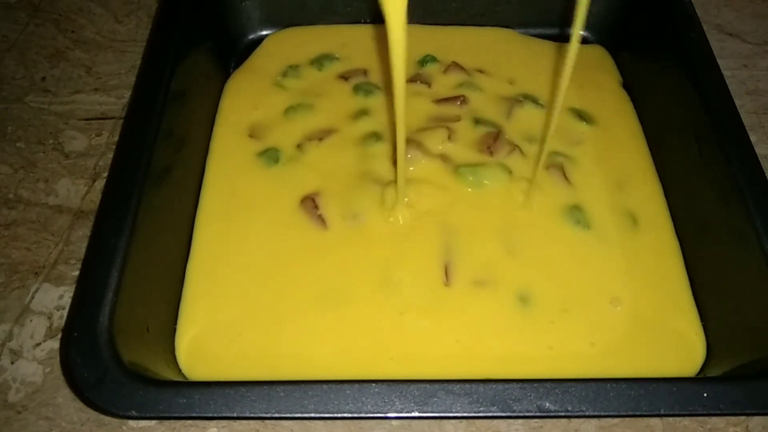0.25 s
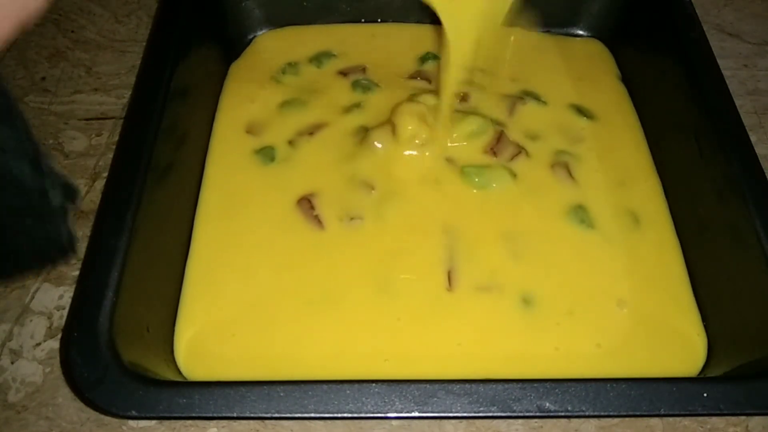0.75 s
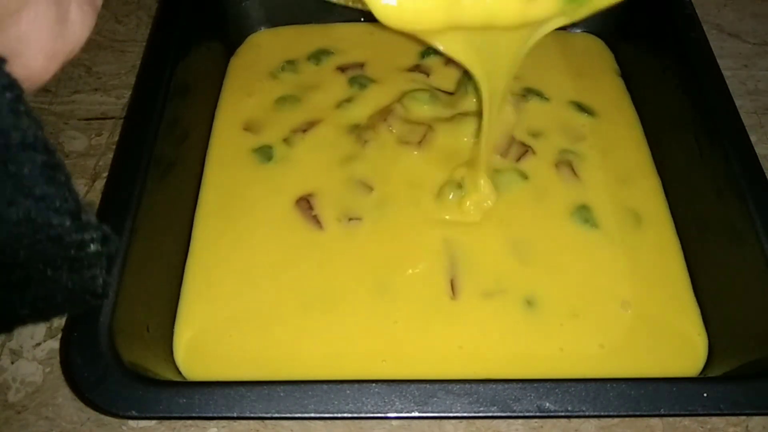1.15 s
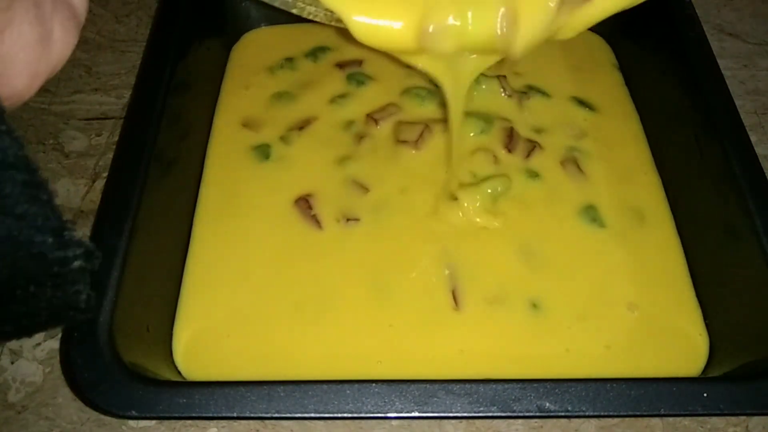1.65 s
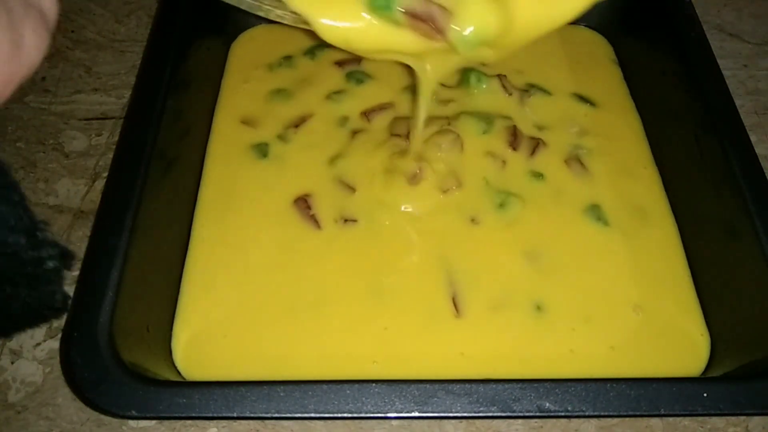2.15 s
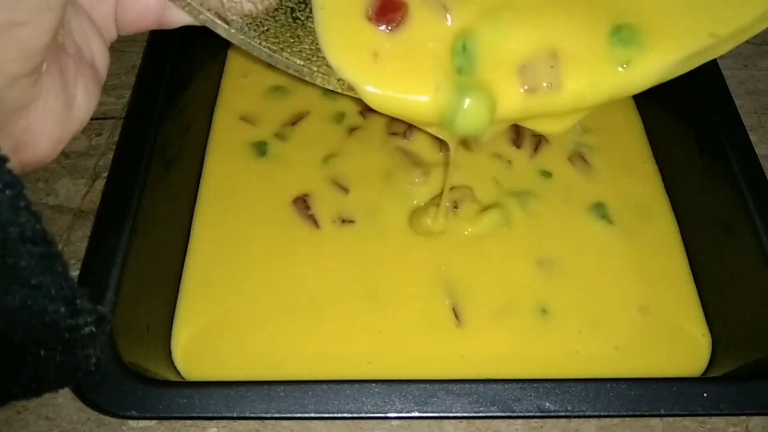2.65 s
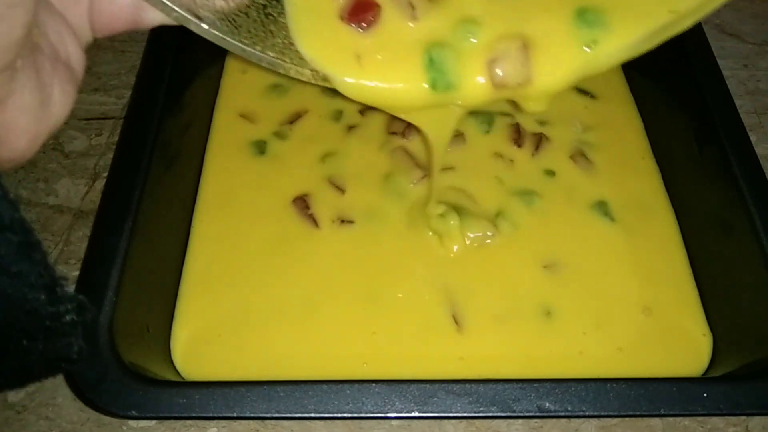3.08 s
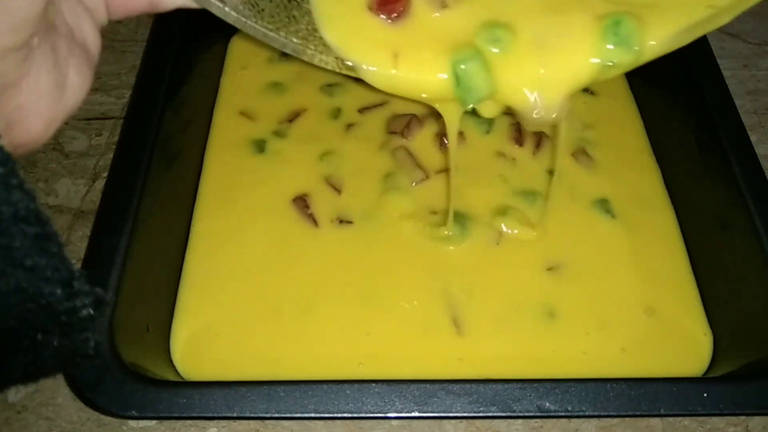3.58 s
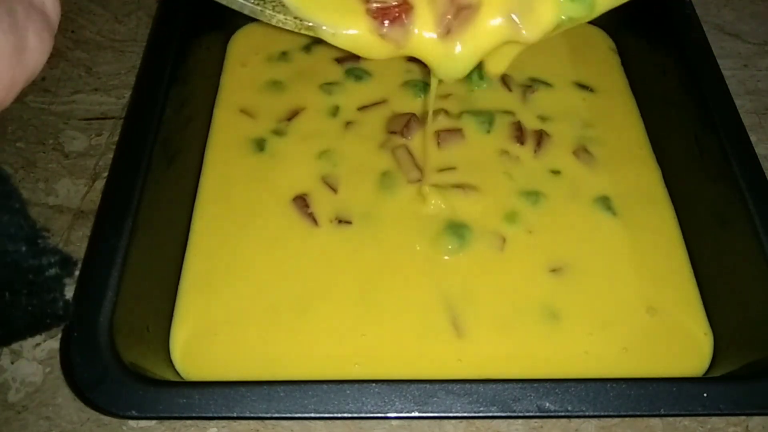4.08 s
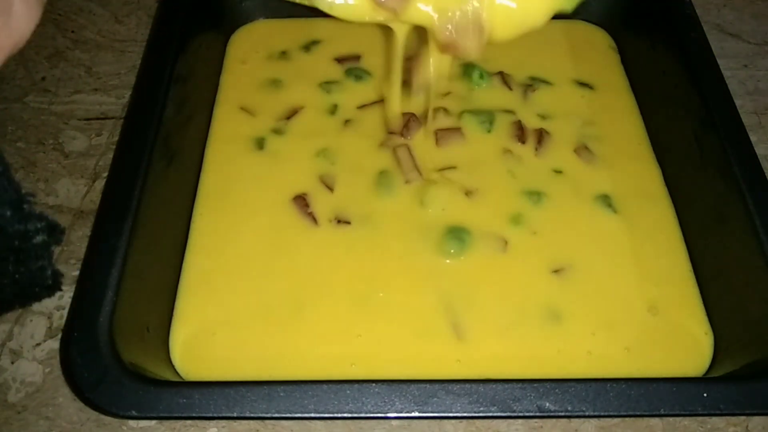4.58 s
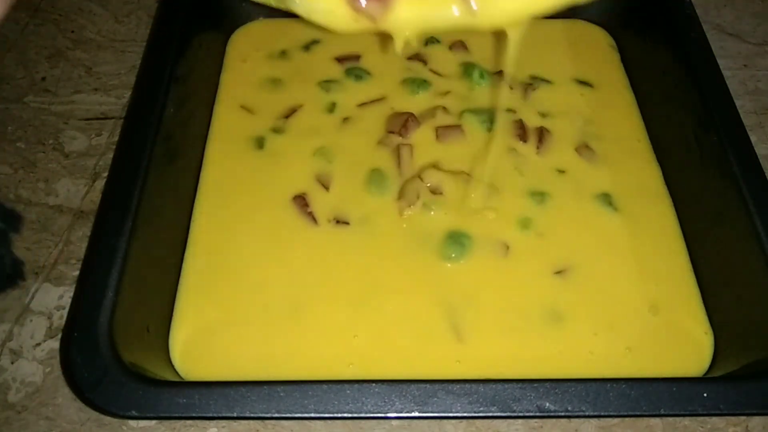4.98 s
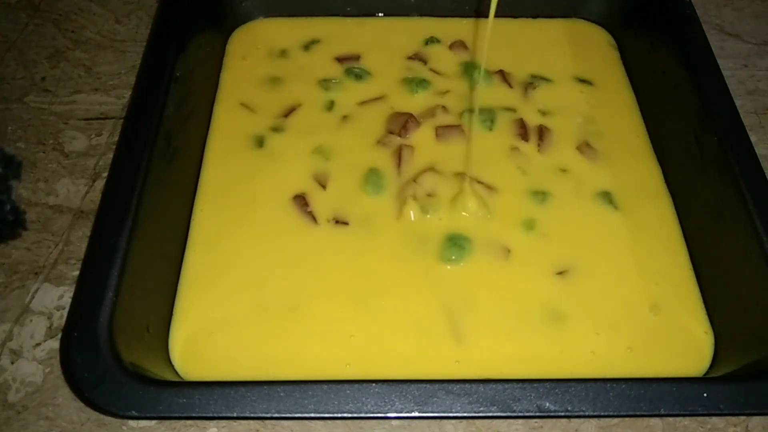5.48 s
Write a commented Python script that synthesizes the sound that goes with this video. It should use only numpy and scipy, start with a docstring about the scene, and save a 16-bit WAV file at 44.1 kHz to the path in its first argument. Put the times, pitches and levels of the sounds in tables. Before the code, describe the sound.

A wire whisk scrapes batter from a glass bowl, with irregular light clinks and one sharp, louder clink near the end.

```python
"""A wire whisk scrapes batter out of a glass bowl in a small hard kitchen.
Each touch is a short rattle of wires that rings the batter-damped glass; blows also thud and start
two longer rings. The wires drag through batter with a flickering hiss, and the bowl sings faintly
near 2.4 kHz under the early scraping. The walls return a dull tail over a low hum and hiss."""
import sys
import numpy as np
from scipy import signal
from scipy.fft import rfft, irfft, next_fast_len
from scipy.io import wavfile
from scipy.ndimage import uniform_filter1d

SR = 44100
rng = np.random.default_rng(int(sys.argv[2]) if len(sys.argv) > 2 else 0)


def int16_out(signal):
    """Quantize to a 16-bit WAV file."""
    q = np.round(np.clip(np.atleast_2d(signal).T, -1, 1) * 32767)
    wavfile.write(sys.argv[1], SR, q.astype(np.int16))


N = 252693
THUD, KNOCK, RIM_RING, CLANK, UPPER_RING, MAIN_RING, SCRATCH, WIRE_TICK = range(8)  # bowl parts

# Whisk blows; thud_db to upper_db are relative to level_db, the main ring's peak:
# start_s, level_db, thud_db, dull_db, bright_db, rim_db, upper_db, contact_ms, glass_db, knock_hz
BLOWS = [(0.06, -42.5, -12, -7, -5.0, -41.0, -42.0, 2, -15, 1000),
         (0.418, -50, -1.5, -2, -9, -10, -18.5, 1.3, 5, 1460),
         (0.478, -49.5, -5, 10, -1, -32, -39.0, 2.3, 2, 2340),
         (0.688, -62.5, 9, 18, -2.0, -41.5, -32.0, 4.7, 1, 3200),
         (0.696, -40.0, -38, -4.5, -1, -35, -30, 1.46, -13, 3540),
         (0.8616, -32.0, -16.0, -9, -5, -42, -29.0, 1.9, -11, 3470),
         (1.0, -41.5, -5.5, -19, -7.5, -10.5, -13, 2, 11, 1390),
         (1.014, -68, -7, 1, 14, -27, -19, 1.5, 1, 1310), (1.034, -75, 26.0, 6, -3, 5, -2, 2.2, -24, 1000),
         (1.4654, -39, -5, -10.5, -11.5, -7.5, -0.5, 3.4, 0, 3500),
         (1.475, -69.5, -7.0, 1, 26, -17, -15, 2.2, -6, 3480),
         (1.9308, -45, -13, 3.5, 3, -31, -12, 1.1, -7, 3200),
         (1.968, -63.5, 9, 9.5, 0.0, 2, 5, 2, -9, 1240),
         (1.974, -42.5, -14.5, -17, 1.5, -25, -30.5, 2.8, 0, 1000),
         (2.353, -35, -15.5, -13, 2, -19, -38.5, 6.6, 3, 3360),
         (2.358, -34, -11, -16.5, -3, -42, -23.0, 2.9, -5, 1690),
         (2.364, -39.5, -41, -10.5, 1.5, -31, -22.0, 2.3, -25, 1430),
         (2.647, -51, -7, 1, 1.5, -32.0, -36.0, 1.1, 11, 2340),
         (2.679, -68.5, 17, 14, 2, -15.0, 10.5, 2.8, -2, 1000),
         (3.1173, -37.5, -9, -8, -7.5, -48, -5, 2.4, -2.5, 3470),
         (3.121, -48, -15.0, 4.5, 2, -31, -26.0, 2.4, -25, 1400),
         (3.133, -43.5, -14, -22.0, -3, -36, -21.0, 1.8, 6, 1520),
         (3.15, -42, -20, -7, -8, -16, -36, 1.6, 3, 3500),
         (3.5898, -36.5, -6.5, -9, 0.5, -6, -35.0, 4.9, 8, 3010),
         (3.598, -27.5, -45, -22, -16, -37, -39, 0.98, -31, 3270),
         (3.658, -48.5, -3.5, -8.5, -9, -8, -46, 3, -19, 1330),
         (3.99, -39.5, -12, -5.5, -6, -10, -19.0, 4.5, -21, 3380),
         (3.995, -22.5, -21.5, -22, -8.0, -25.5, -21, 2.9, -4.5, 3500),
         (4.079, -49.5, -8, -10, -3, -13.0, -33, 1.8, -6, 3500),
         (4.098, -44.5, -9, 0, -5.5, -23, -29.0, 5.9, -12, 2000),
         (4.385, -33.5, -17.5, -16, -16, -26, -16, 5.7, 3, 3430),
         (4.392, -56.5, -11, 12, 19.5, 10, -9, 1.3, -13, 1330),
         (4.4004, -52.5, -4, 6, 14, -10, -28.0, 3.6, -21, 3500),
         (4.409, -41, -13, -23, -29, -13, -29.0, 3.2, -3, 3480),
         (4.8242, -40, -7.5, 2.5, -7, -19, -13, 1.34, -14, 2670),
         (4.9199, -30.5, -9, -10, -5.5, -24, -11, 3.3, -18, 1020),
         (4.9283, -35, -17.0, -6, -3.5, -36, 1.5, 1.8, 6, 1150),
         (5.043, -60, -17.0, -10, -10, 4, 0.0, 2.2, -11, 3170),
         (5.0883, -25.5, -25, -17, -2, -40, -39, 1.6, 15, 3280),
         (5.0902, -5, -41, -21.5, -16.5, -39, -50, 2.6, 12.5, 2430),
         (5.3135, -39, -0.5, -6, 0, 1.5, 2, 2.2, 11, 980),
         (5.322, -34, -12, -14, -5.5, -35, -15, 3.7, -22, 3500),
         (5.399, -52, -23.5, -13.5, -16.0, 9.5, -28.0, 1.8, -12.5, 3500),
         (5.41, -48, -12, -8, -2, 7, -41.0, 8, -20, 2580),
         (5.467, -48.5, -7.5, 4, 0.5, -17, -9.0, 3.2, -19, 1375),
         (5.597, -36, -7.5, -11, -11, 11.5, -40, 2.6, 4.5, 3500),
         (5.608, -36, -34, -17, -10.5, -6, -38.5, 2.8, -11, 1074),
         (5.627, -50, 5, 0, -1, 8, -1, 2.7, -20, 984)]
def whisk_blows():
    """Blows shake the whole bowl: returns the body (thud, long rings) and the surface rattle."""
    start_s, level_db, thud_db, dull_db, bright_db, rim_db, upper_db, *contact = np.transpose(BLOWS)
    body_db = {THUD: level_db + thud_db, RIM_RING: level_db + rim_db, UPPER_RING: level_db + upper_db}
    body = wire_contacts(start_s, body_db, *contact)
    surface = wire_contacts(start_s, surface_levels(level_db, dull_db, bright_db), *contact)
    return body, surface


# Brief wire ticks: start_s, level_db, dull_db, bright_db
TICKS = [(0.0164, -69, -1, 8), (0.0887, -57, -12, 4.5), (0.1087, -54, -6, -6), (0.1234, -59, 1, 0),
         (0.1353, -55.5, 2, -2), (0.174, -37.5, -36, -6.5), (0.1795, -37, -20, -7),
         (0.2611, -48.5, -11, -8), (0.4574, -44.5, -25, -5), (0.4709, -43.5, -3, -5), (0.819, -58, -15, -8),
         (1.1055, -56, -7, 0.5), (1.326, -58, -8, -2.5), (1.5535, -56.5, 3, -3), (1.5919, -52.5, -2, -18),
         (1.6251, -49, -17, 6), (1.6462, -55, -10, -7), (1.6656, -53.5, -17, -1),
         (1.7852, -47.5, -12, -8.5), (1.9802, -44, -15, -6), (2.0038, -48.5, -13, -6),
         (2.1527, -52.5, -6, -4), (2.415, -54, -7, -12), (2.568, -54.5, -32, -5), (2.7494, -49, -12, -11),
         (2.841, -52, -3.5, -11), (2.8669, -44, -11.5, -11), (3.7222, -52, -1.5, -3),
         (3.7372, -49.5, -9, -16), (3.761, -58, -16, -1), (3.7945, -49, -13, -7.5), (3.8055, -49, -7, -22),
         (3.8445, -56.5, -15, -6), (4.1214, -59, -14, -10), (4.1794, -59, -2, -15), (4.5027, -54.5, 1, -12),
         (4.5675, -59, -4, 2), (4.8333, -55, -12, -4), (5.4575, -51.5, 4, -2), (5.6734, -56, -5, -7.5)]
def wire_ticks(strays_per_s=2.5, over_scrape_db=12.5, bright_lift_db=4.5):
    """Brief wire ticks on the glass, with no thud or long ring; strays follow the scrape's level."""
    stray_at = rng.integers(N, size=int(strays_per_s * N / SR))
    stray_db = [over_scrape_db, -8, -8] + rng.standard_normal((len(stray_at), 3))
    stray_db[:, 0] += curve(SCRAPE_LEVEL, 1)[stray_at]
    strays = np.c_[stray_at / SR, stray_db]
    start_s, level_db, dull_db, bright_db = np.vstack([TICKS, strays]).T
    part_db = surface_levels(level_db, dull_db, bright_db + bright_lift_db)
    count = len(start_s)
    return wire_contacts(start_s, part_db, contact_ms=np.full(count, 0.9), glass_db=-6.5,
                         knock_hz=rng.uniform(1515, 3500, count))


def surface_levels(level_db, dull_db, bright_db):
    """Peak dB per part: dullness lifts knock and clank, brightness lifts scratch and wire tick."""
    return {KNOCK: level_db + dull_db, CLANK: level_db + 0.47 * dull_db - 1, MAIN_RING: level_db,
            SCRATCH: level_db + bright_db, WIRE_TICK: level_db + 0.8 * bright_db - 6.5}


def wire_contacts(start_s, part_db, contact_ms, glass_db, knock_hz):
    """Wires land, drag and let go, driving the bowl's parts; batter mutes all but the long rings."""
    t_ms = np.arange(SR // 40) * 1000 / SR
    envelope = (1 - np.exp(-t_ms / 0.5)) * np.exp(-(t_ms / contact_ms[:, None]) ** 0.98)
    rattle = rng.standard_normal(envelope.shape) * envelope
    first_push = (t_ms * np.exp(-t_ms / 0.019))[None]
    touches = 0
    for part, peak_db in part_db.items():
        response, modes = bowl_response(part)
        drive = first_push if part == THUD else rattle
        strength = np.linalg.norm(drive, axis=1)
        glass_gain = strength * undb(0 if part in (RIM_RING, UPPER_RING) else glass_db)
        for hz, mode in modes:
            # each mode takes about its own share, however the wires land
            drive_at_mode = np.abs(drive @ np.exp(2j * np.pi * hz * t_ms / 1000))
            share = glass_gain / np.hypot(drive_at_mode, 0.3 * strength)
            response = response + share[:, None] * mode
        if part == KNOCK:
            response = response + wet_knock(knock_hz)
        rung = signal.fftconvolve(drive, response, axes=1)
        touches = touches + rung / np.abs(rung).max(axis=1)[:, None] * undb(peak_db)[:, None]
    track = np.zeros(N + touches.shape[1])
    for at, touch in zip((start_s * SR).astype(int), touches):
        track[at:at + len(touch)] += touch
    return track[:N]


# Band of each part, THUD to WIRE_TICK: low_hz, high_hz
PART_BANDS = [(190, 1100), (1500, 3600), (3700, 4400), (4000, 5900), (5750, 6400), (6300, 7800),
              (7800, 9400), (9500, 14000)]
# Modes over bare contact in each part, before a touch's glass_db: gain_db
PART_MODE_GAINS = [9.5, -4.5, 15.5, -6.5, 22.5, 11.5, 9, -2]
# Glass bowl modes: pitch_hz, gain_db, t60_s
BOWL_MODES = [(234, -4.5, 0.043), (583.5, -4.5, 0.065), (858, -4.5, 0.031), (1023, -8, 0.068),
              (1640, -4, 0.032), (2408, -2, .018), (4039, 0, .125), (6062, 0, .06), (4600, 1, 0.014),
              (5330, -5, 0.012), (5760, -2, .015), (6980, -4, 0.014), (7180, 3, .02), (7560, -4, 0.02),
              (8000, -1.5, 0.013), (8480, -2.5, 0.011), (10190, 4, 0.0064), (12000, -16.5, 0.011)]
def bowl_response(part):
    """One part's answer to a click: the bare contact and a list of (hz, ringing mode)."""
    edges_hz = PART_BANDS[part]
    above_hz = PART_BANDS[part - 1][1] if part else 0
    click = np.full(SR // 7, 1e-18)
    click[0] = 1
    bare = unit(band(band(click, *edges_hz), *edges_hz))
    modes = [(hz, band(undb(db) * ring(click, hz, t60_s), *edges_hz))
             for hz, db, t60_s in BOWL_MODES if above_hz < hz < edges_hz[1]]
    glass = sum(mode for _, mode in modes)
    gain = undb(PART_MODE_GAINS[part]) / np.sqrt(np.mean(glass ** 2))
    return bare, [(hz, gain * mode) for hz, mode in modes]


def wet_knock(pitch_hz, over_bare_db=8, t60_s=0.0053):
    """A short hollow resonance at each contact's own pitch."""
    t = np.arange(SR // 7) / SR
    tones = np.sin(2 * np.pi * pitch_hz[:, None] * t) * np.exp(-np.log(1000) * t / t60_s)
    return undb(over_bare_db) * np.array([unit(tone) for tone in tones])


# Wet scrape spectrum: freq_hz, density_db
SCRAPE_SPECTRUM = [(1800, -41.5), (3000, -4), (4200, -6.5), (6200, -0.5), (7500, -4.5), (9000, -7),
                   (11000, -14.5), (13500, -29.5), (16500, -24)]
# Wet scrape envelope: time_s, level_db
SCRAPE_LEVEL = [(0.0, -69.5), (0.35, -74), (0.51, -72.5), (0.96, -70.5), (1.66, -73.5), (1.77, -78),
                (2.78, -73.5), (2.94, -97.5), (3.16, -60.5), (3.4, -102), (3.62, -73), (3.77, -66.5),
                (4.02, -88), (4.15, -78.5), (4.45, -74), (4.55, -70), (4.88, -82), (5.07, -57),
                (5.3, -71.5), (5.44, -65), (5.63, -74.5), (5.73, -66)]
def batter_scrape():
    """Wires drag through batter: a soft flickering hiss that faintly sounds the glass."""
    drag = rng.standard_normal(N)
    glass = sum(undb(db) * ring(drag, hz, t60_s) for hz, db, t60_s in BOWL_MODES if hz > 1500)
    hiss = unit(coloured_noise(SCRAPE_SPECTRUM)) + undb(-24) * unit(glass)
    flicker_db = 5.1 * waver(rate_hz=39) + 4.0 * waver(rate_hz=110)
    return unit(hiss * undb(flicker_db)) * undb(curve(SCRAPE_LEVEL, 1))


# Singing bowl mode envelope: time_s, level_db
SINGING_LEVEL = [(0, -96), (.25, -79), (.9, -84), (1.25, -70.5), (1.7, -95), (2.0, -100)]
def bowl_singing():
    """One bowl mode sings faintly under the early scraping."""
    drag = rng.standard_normal(N)
    return unit(ring(drag, hz=2400, t60_s=0.026)) * undb(curve(SINGING_LEVEL, 1))


# Wall reverberation: freq_hz, t60_s, gain_db
WALL_DECAY = [(296, 0.36, 9.5), (1940, 0.68, -1), (6840, 0.61, -6.5), (9650, 0.46, -9), (12400, 0.38, -1),
              (15900, 0.29, 2)]
def wall_tail(sound, delay_s=0.00043):
    """Hard walls return a diffuse tail that dies faster in the treble."""
    t = np.arange(int(0.7 * SR)) / SR
    freq_hz, t60_s, gain_db = np.transpose(WALL_DECAY)
    tail = 0
    for hz in 250 * 2 ** np.arange(0, 6.1, 0.5):
        decay = np.exp(-np.log(1000) * t / log_interp(hz, freq_hz, t60_s))
        half_octave = band(rng.standard_normal(len(t)), hz / 2 ** 0.25, hz * 2 ** 0.25)
        tail = tail + half_octave * decay * undb(log_interp(hz, freq_hz, gain_db))
    tail *= np.clip(t / delay_s - 1, 0, 1)
    return signal.oaconvolve(sound, tail / np.linalg.norm(tail))[:N]


# Background spectrum, before each band is levelled: freq_hz, density_db
KITCHEN_SPECTRUM = [(30, -3), (68, 4), (109, 5.5), (320, -1.5), (400, -8.5), (1000, -11), (1430, -12),
                    (3000, -15), (4500, -17), (8000, -38.5)]
# Background envelopes: time_s, hum_db, hiss_db
KITCHEN_LEVEL = [(0.0, -73.5, -73), (0.46, -69, -75.5), (0.69, -71.5, -73), (1.37, -66.5, -70.5),
                 (1.47, -64, -73), (1.74, -72, -74.5), (2.39, -72, -75), (3.14, -74.5, -75),
                 (3.42, -79.5, -79), (3.64, -77, -97.5), (3.77, -71, -79), (4.07, -77, -73),
                 (4.18, -71, -75.5), (4.84, -74, -75), (5.03, -70.5, -75), (5.28, -71, -73),
                 (5.41, -71, -71), (5.55, -76, -78), (5.73, -70, -77)]
def kitchen_background():
    """Rumble, hum and hiss, each wavering on its own."""
    air = coloured_noise(KITCHEN_SPECTRUM)
    lows, lows_and_mids = lowpass(air, 304), lowpass(air, 1100)
    rumble = unit(lows) * undb(-72 + 1.1 * waver(rate_hz=3.2))
    hum = unit(lows_and_mids - lows) * undb(curve(KITCHEN_LEVEL, 1) + 2.5 * waver(rate_hz=23))
    hiss = unit(air - lows_and_mids) * undb(curve(KITCHEN_LEVEL, 2) + 0.75 * waver(rate_hz=20))
    return rumble + hum + hiss


def undb(db):
    return 10 ** (np.asarray(db) / 20)


def unit(x):
    return x / np.sqrt(np.mean(x ** 2))


def band(x, low_hz, high_hz):
    return signal.sosfilt(signal.butter(2, [low_hz, high_hz], "bandpass", fs=SR, output="sos"), x)


def lowpass(x, hz):
    return signal.sosfiltfilt(signal.butter(2, hz, fs=SR, output="sos"), x)


def curve(table, column):
    table = np.array(table)
    return np.interp(np.arange(N) / SR, table[:, 0], table[:, column])


def log_interp(hz, points_hz, values):
    return np.interp(np.log(hz), np.log(points_hz), values)


def coloured_noise(spectrum):
    size = next_fast_len(N)
    bin_hz = np.maximum(np.arange(size // 2 + 1) * SR / size, 1)
    gain = undb(log_interp(bin_hz, *np.transpose(spectrum)))
    return irfft(rfft(rng.standard_normal(size)) * gain, size)[:N]


def waver(rate_hz):
    """Random levels joined by ramps."""
    hold = int(SR / rate_hz)
    steps = np.repeat(rng.standard_normal(N // hold + 1), hold)
    return 0.8 * uniform_filter1d(steps, hold)[:N]


def ring(x, hz, t60_s):
    """One decaying mode driven by x."""
    radius, angle = np.exp(-np.log(1000) / (t60_s * SR)), 2 * np.pi * hz / SR
    return signal.lfilter([np.sin(angle)], [1, -2 * radius * np.cos(angle), radius ** 2], x)


def scene():
    """Bowl, walls and background; left and right differ only in the treble of touches and tail."""
    body, surface = whisk_blows()
    ticks = wire_ticks()
    direct = body + surface + ticks
    to_walls = undb(-14.5) * body + undb(-8.5) * surface + undb(-4.5) * ticks
    mid = direct + wall_tail(to_walls) + batter_scrape() + kitchen_background() + bowl_singing()
    side_hz = (10080, 16000)
    side = undb(-19.5) * band(band(direct + wall_tail(to_walls), *side_hz), *side_hz)
    return np.array([mid + side, mid - side])


def record(dry, low_hz=48, top_hz=16200):
    """A nearby phone drops the deep bass and cuts the top."""
    dry = signal.sosfilt(signal.butter(4, low_hz, "highpass", fs=SR, output="sos"), dry)
    return signal.sosfilt(signal.ellip(10, 0.2, 80, top_hz, fs=SR, output="sos"), dry)


dry = scene()
out = record(dry)
int16_out(out)
```